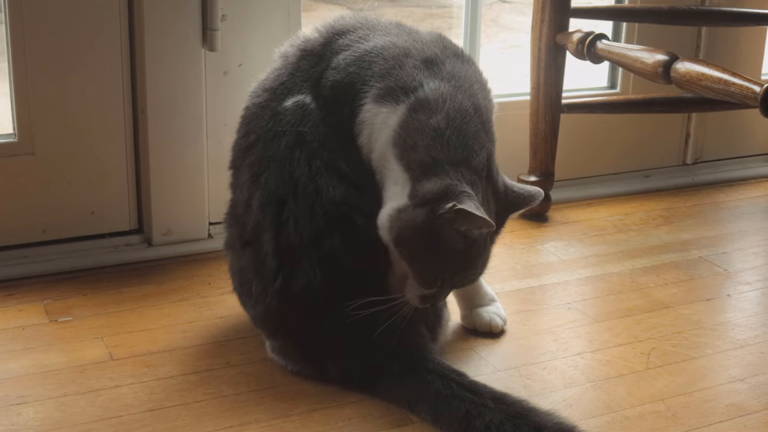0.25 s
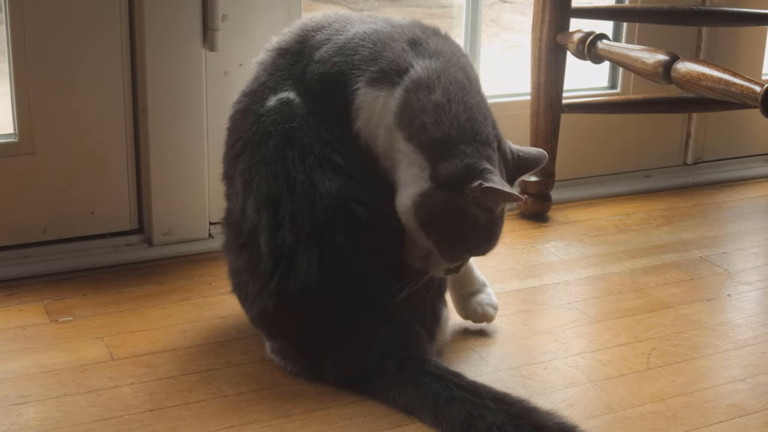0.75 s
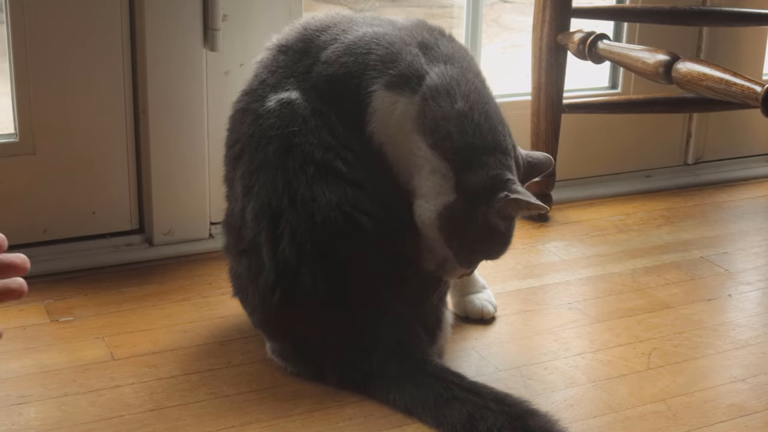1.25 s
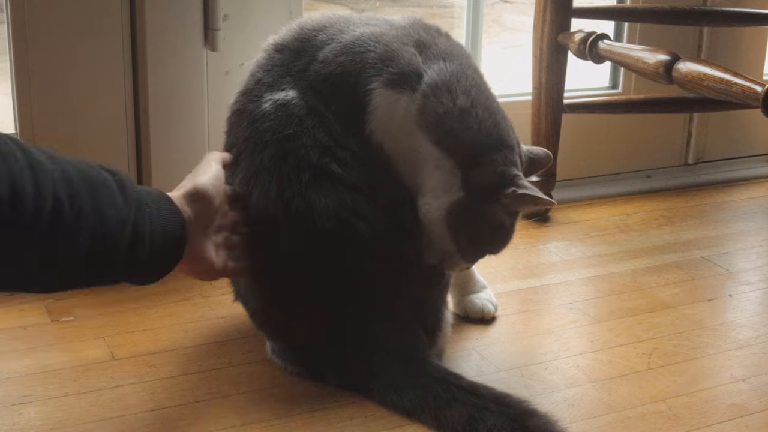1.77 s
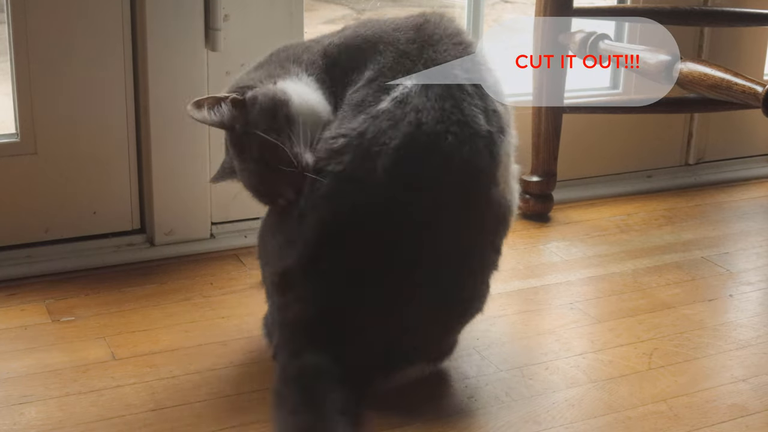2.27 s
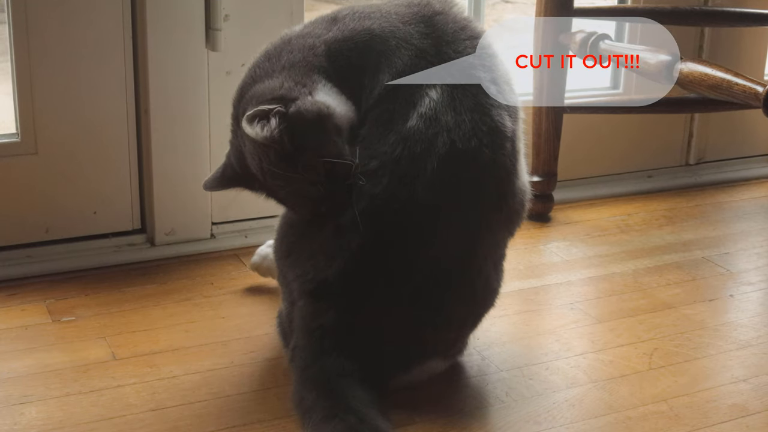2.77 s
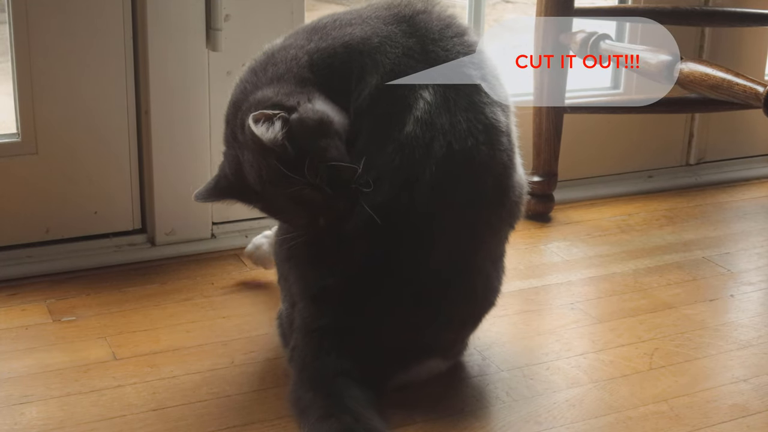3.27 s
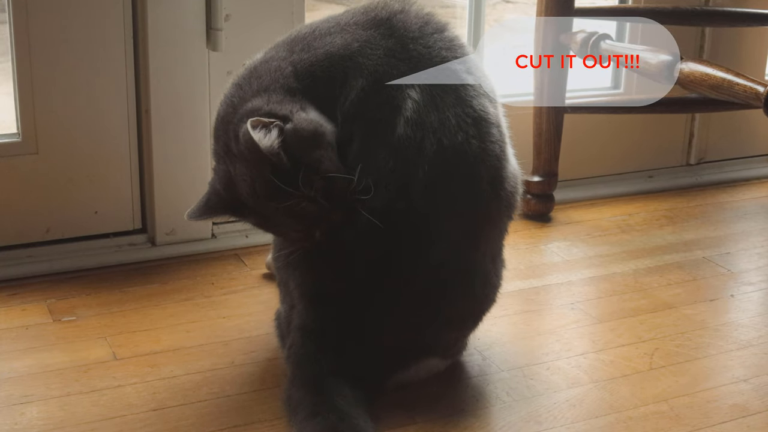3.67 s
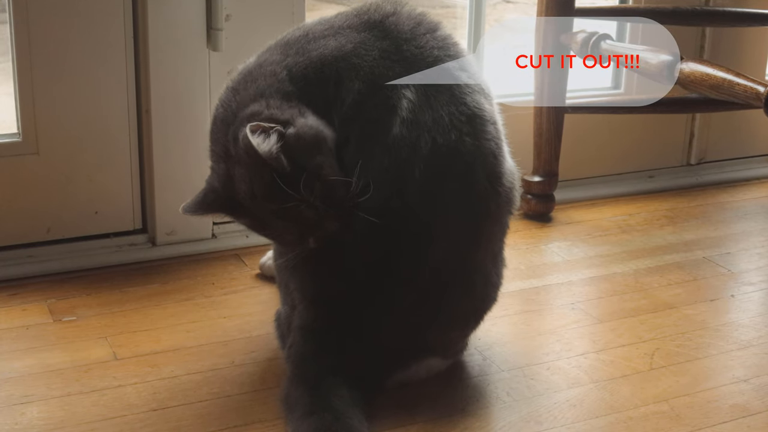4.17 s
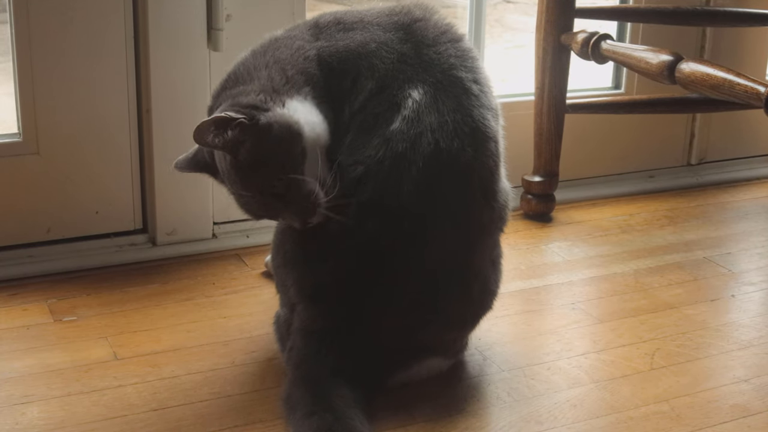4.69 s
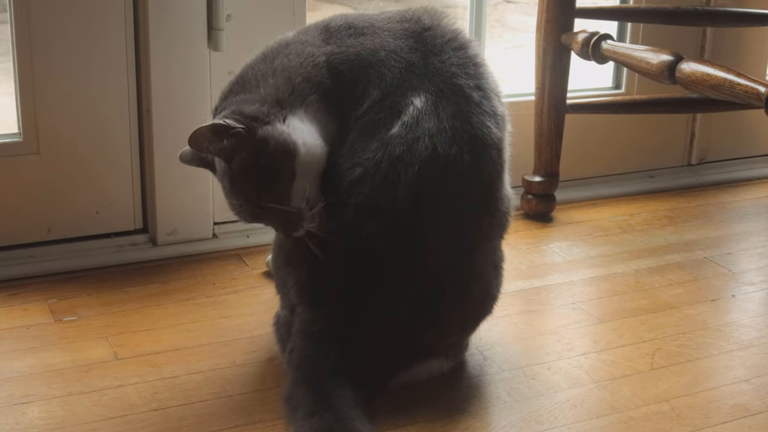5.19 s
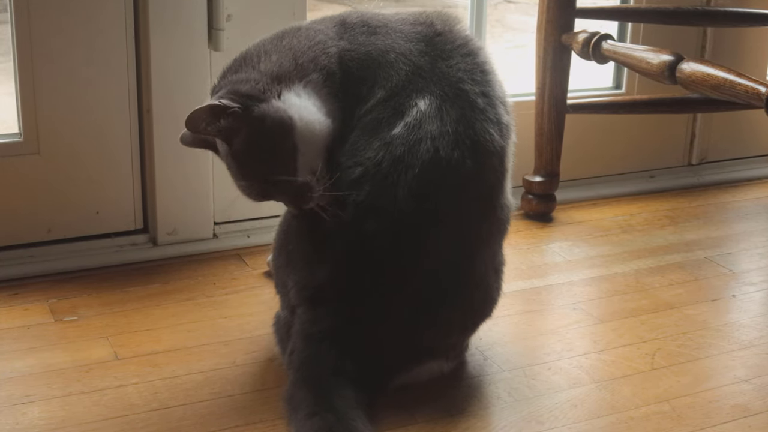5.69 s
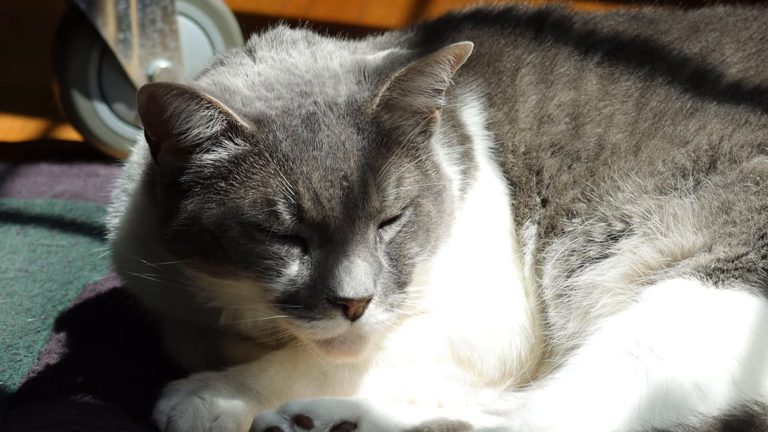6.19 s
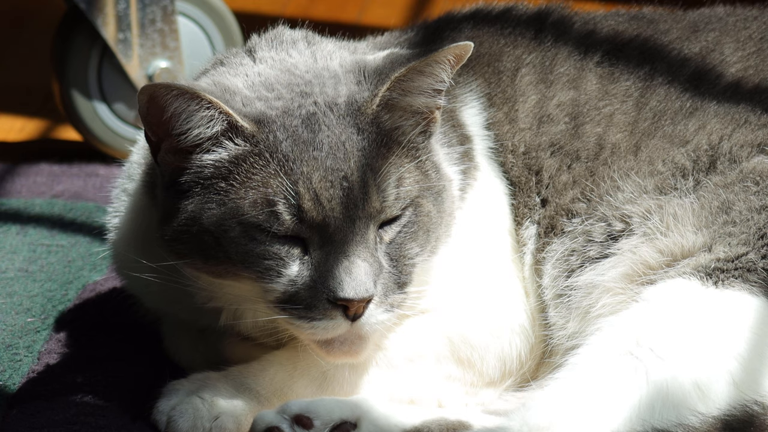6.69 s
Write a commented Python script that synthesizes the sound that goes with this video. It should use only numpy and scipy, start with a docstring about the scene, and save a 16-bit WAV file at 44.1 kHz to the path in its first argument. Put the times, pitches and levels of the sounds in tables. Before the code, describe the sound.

A cat grooms close to a small stereo microphone in a bare, reverberant room with a wooden floor. Short wet clicks come irregularly, with soft fur rustle and low shuffling in the boards. Farther off, objects are knocked and set down: thumps at the start, a clack near 1.4 seconds, the strongest bang near 3.1, another around 5.1. Faint air noise and hum lie beneath. It cuts dead near 6.2 seconds.

```python
"""In a bare, echoing house with a wooden floor, a cat licks its fur a step from a small stereo camera.
Air noise is shaped noise and a low appliance hum is wavering sines; fur rustle is filtered crackle,
and shifting weight is soft low noise in the boards. Further off, things are knocked and set down:
banded noise echoes with ringing panels. Tongue clicks are short dying sines with wet noise snaps.
The sound stops dead before the end."""
import sys
import numpy as np
from scipy import signal
from scipy.fft import rfft, irfft, next_fast_len
from scipy.io import wavfile
from scipy.ndimage import uniform_filter1d

SR = 44100
rng = np.random.default_rng(int(sys.argv[2]) if len(sys.argv) > 2 else 0)


def unload_audio(sound):
    """Save the sound as a 16-bit wav file, at the path given as the first command line argument."""
    columns = np.transpose(np.atleast_2d(sound))
    # keep every value between -1 and 1, then stretch to whole-number steps
    steps = np.round(np.clip(columns, -1, 1) * 32767)
    wavfile.write(sys.argv[1], SR, steps.astype(np.int16))


N = 306039  # samples

# All levels are relative to one another, ahead of the stereo balance and the camera.
# Air noise spectrum: frequency_hz, density_db (its shape only; AIR_DB sets the level)
AIR_SPECTRUM = [(15, -58.5), (35, -23), (64, -5.5), (102, -3.5), (223, 0), (280, -9), (373, -1), (624, -11),
                (2000, -14.5), (8000, -26.5), (11700, -26), (13300, -34), (16000, -45)]
# Hum partials: frequency_hz, mean_level_db (rms)
HUM_PARTIALS = [(75.4, -62), (296.1, -62.5), (387.6, -64.5), (473.7, -71), (3208, -76), (7284, -99.5)]
# Strokes through the fur: loudest_s, level_db, swell_s, fade_s (both times to 10 dB down)
FUR_STROKES = [(0.0, -51, .05, 0.063), (1.96, -64, .04, 0.036), (2.16, -45.5, 0.19, 0.099),
               (2.582, -48.5, 0.016, 0.022), (2.78, -55.5, .08, 0.034), (3.67, -52, 0.02, 0.19),
               (3.78, -50, 0.049, 0.088), (3.94, -49, 0.1, .1), (4.28, -46.5, 0.078, 0.069),
               (4.65, -55, 0.14, 0.23)]
# Restlessness between strokes, joined by straight lines: time_s, rustle_db, shuffle_db
RESTLESSNESS = [(0, -60, -44.5), (.4, -66, -45.5), (.52, -81, -62), (.9, -65.5, -70), (1.6, -65, -51.5),
                (1.8, -62, -64), (1.95, -63, -49.5), (2.56, -57.5, -47.5), (2.75, -59, -58.5),
                (2.9, -71, -47), (3.1, -50, -47), (3.6, -60.5, -61), (3.791, -67, -50.5), (4.1, -72, -54),
                (4.27, -58, -48.5), (4.55, -63.5, -64.5), (5.4, -60, -57), (5.63, -62.5, -56),
                (5.8, -59.5, -51.5), (6.2, -64, -62)]
# Knocks in the house: start_s, boom_db, thud_db, thud_hz, clack_db, clack_hz,
# treble_fall_db_per_octave, rise_s (scaled by band), rattle_length_s, echo_ratio (to the room's decay)
HOUSE_KNOCKS = [(0.004, -56, -49.5, 284, -49, 3300, 9, 0.0011, 0.031, 1.7),
                (0.08, -33, -31, 282, -35, 1900, 16, 0.078, 0.075, 0.53),
                (0.138, -43, -25.5, 490, -34.5, 890, 3.13, 0.0025, .04, 0.76),
                (0.959, -69, -52.5, 620, -56, 1800, 11, 0.0043, .02, 0.96),
                (1.33, -64, -37, 327, -49, 2000, 3, 0.064, .079, 1.3),
                (1.397, -58, -30, 310, -30.5, 1930, 12, 0.0052, 0.033, 0.8),
                (1.804, -70, -40, 290, -41.5, 900, 1.5, 0.00053, 0.003, 0.25),
                (1.866, -60, -44.5, 408, -55, 2200, 4.5, 0.0036, 0.015, 1.2),
                (1.902, -43, -40, 280, -53, 2000, 15, 0.0057, 0.01, 1),
                (1.948, -53, -39.5, 278, -53, 3000, 1, 0.0051, 0.0085, 0.45),
                (2.015, -62, -41.5, 287, -48, 1920, 6.5, .0043, 0.013, .99),
                (2.328, -35, -60, 155, -38, 2370, 4.5, 0.00074, .008, 0.63),
                (2.489, -70.5, -44, 300, -53.5, 1810, 5, .01, .02, 1.4),
                (2.547, -41, -44.5, 138, -52, 806, 7, 0.0024, .015, 1.64),
                (2.869, -53, -32, 182, -35.5, 700, 4, 0.0039, 0.035, 0.73),
                (3.095, -44, -20.5, 160.1, -20, 520, 2, 0.0057, .04, 0.91),
                (3.573, -64, -47.5, 436, -53.5, 1860, 6, 0.0092, 0.033, .92),
                (4.138, -52, -42.5, 310, -50, 840, 11.5, .002, 0.021, 0.87),
                (4.327, -54, -45.5, 150, -44.5, 764, 22, 0.0083, 0.019, 0.75),
                (5.086, -31.5, -23, 388, -26, 1260, 2, 0.013, 0.048, 0.9),
                (5.862, -28.5, -40.5, 163, -45, 390, 6, 0.011, 0.035, 1.14),
                (6.156, -40.5, -36, 190, -34, 1460, 8, 0.013, .035, 1)]
# Edges of adjoining frequency bands: edge_hz
BAND_EDGES_HZ = [60, 115, 210, 340, 620, 1050, 1500, 2600, 4500, 8000, 13500]
# Room decay in each band: t60_s (before a knock's echo_ratio)
ROOM_T60_S = [0.37, 0.37, 0.578, 0.56, 0.66, 0.75, 0.74, 0.68, 0.64, 0.49]
# Left-right likeness of the echo in each band: likeness (0 to 1)
ROOM_LIKENESS = [.96, .97, .9, .8, .4, .1, 0, .1, .05, .1]
# How strongly the house passes each band: gain_db
ROOM_GAIN_DB = [-4, 0.7, -0.5, 1, 0, -0.3, 1.5, 0.1, 1.35, -0.5]
# Floor and door panel modes: frequency_hz, level_db (before PANELS_DB), t60_s (before echo_ratio)
PANEL_MODES = [(103, 3, 0.17), (138, 4.5, 0.24), (182.7, 2.5, 0.59), (281, -4.5, 0.17), (298, 4.5, 0.16),
               (387.6, 2.5, 0.65), (417, -2, 0.33), (492, -8.5, 0.46), (734, -12, 0.37), (895, 3, 0.57),
               (995, -10.5, 0.3), (1504, 0, 0.29)]
# Tongue clicks: start_s, mouth_db, mouth_hz, snap_db, snap_hz (levels are of the main sine before decay)
TONGUE_CLICKS = [(.097, -52, 2000, -39, 9000), (.304, -60, 2000, -47, 11500), (.392, -52, 2000, -48, 10300),
                 (.4045, -42, 5000, -38, 7040), (.5283, -64, 2000, -44, 9860),
                 (.865, -59, 2000, -37, 11700), (.991, -54, 2700, -47, 7290),
                 (1.0556, -41, 1850, -63, 6900), (1.1137, -41, 2320, -44, 8930),
                 (1.741, -40, 2600, -35, 9500), (2.0786, -35, 1500, -37, 3200),
                 (2.5086, -49, 2000, -41, 6800), (2.641, -45, 1810, -58, 7430),
                 (3.791, -42, 2120, -54, 7040), (4.017, -41, 2000, -56, 6230),
                 (4.025, -40, 2150, -57, 6000), (4.033, -42, 2500, -55, 6300),
                 (4.040, -41, 3000, -59, 6500), (4.047, -43, 2400, -63, 6500),
                 (4.463, -48, 2700, -58, 6000), (4.478, -44, 2900, -66, 6080),
                 (4.882, -36, 2050, -47, 9430), (4.9786, -30, 2150, -41, 7360),
                 (5.015, -36, 1800, -41, 4300), (5.040, -62, 2270, -47, 6000),
                 (5.3615, -33, 2333, -53, 6180), (5.7786, -32, 5140, -41, 7500)]

AIR_DB = -52.5  # rms
PANELS_DB = -5.5  # added to every panel mode
BOOM_HZ = 88
THUD_FALL_DB = 22.5  # fall one octave off the pitch of boom or thud, growing as octaves squared
CLACK_RISE_DB = 4.5  # per octave below the clack's pitch
EARLY_SHARE, EARLY_T60_S = 0.31, 0.12  # the near walls' echo; the decay is scaled by echo_ratio
MOUTH_CYCLES = 30  # cycles of the mouth's main ring until 60 dB down
FLOOR_ECHO_DB, SCATTER_DB = -8, -35
RIGHT_DB = 2.5  # right above left
LOW_CUT_HZ, TOP_HZ = 45, 15700
STOP_S = 6.197

FFT_SIZE = next_fast_len(N + SR)
HZ = np.arange(FFT_SIZE // 2 + 1) * SR / FFT_SIZE
BAND_FILTERS = [signal.butter(3, edges, "band", fs=SR, output="sos")
                for edges in zip(BAND_EDGES_HZ, BAND_EDGES_HZ[1:])]


def undb(db):
    """Decibel law: amplitude gain is ten to the power of level over twenty."""
    return 10 ** (np.asarray(db) / 20)


def level(x, db):
    """Root-mean-square normalisation: scale a signal to an rms level."""
    return x * undb(db) / np.sqrt(np.mean(x ** 2))


def walk(rate):
    """Smoothed random modulation: levels held 1 / rate s, averaged twice, with a spread near 1."""
    hold = int(SR / rate)
    steps = np.repeat(rng.standard_normal(N // hold + 1), hold)
    slewed = uniform_filter1d(uniform_filter1d(steps, hold), hold)
    return 1.5 * slewed[:N]


def air_noise():
    """Diffuse-field coherence: left and right agree in the bass and part towards the treble."""
    hz, db = np.transpose(AIR_SPECTRUM)
    colour = undb(np.interp(np.log(HZ + 1), np.log(hz), db))
    alike = .9 / (1 + (HZ / 750) ** 3)
    mid, side = rfft(rng.standard_normal((2, FFT_SIZE)))
    sides = np.sqrt(1 - alike) * side * np.array([[1], [-1]])
    air = irfft(colour * (np.sqrt(1 + alike) * mid + sides))[:, :N]
    return level(air, AIR_DB)


def appliance_hum():
    """Additive synthesis: steady partials wavering in level and phase."""
    t = np.arange(N) / SR
    hum = np.zeros(N)
    for hz, db in HUM_PARTIALS:
        gain = np.sqrt(2) * undb(db + 1.0 * walk(8.6))  # rms to peak
        hum += gain * np.sin(2 * np.pi * hz * t + 0.6 * walk(24))
    return hum


def band(lo_hz, hi_hz, steep=3):
    """Butterworth magnitude law: a smooth band-pass gain over the spectrum."""
    low_side = 1 + (lo_hz / (HZ + 1)) ** (2 * steep)
    high_side = 1 + (HZ / hi_hz) ** (2 * steep)
    return 1 / np.sqrt(low_side * high_side)


def pair(count, alike):
    """Stereo correlation: shared and opposed noise mixed to a given left-right likeness."""
    mid, side = rng.standard_normal((2, count))
    alike = np.clip(alike, 0, 1)
    return np.sqrt((1 + alike) / 2) * mid + np.sqrt((1 - alike) / 2) * side * np.array([[1], [-1]])


def fur_rustle():
    """Friction noise: dense fine crackle between hairs, swelling with each stroke."""
    t = np.arange(N) / SR
    time_s, rustle_db, _ = np.transpose(RESTLESSNESS)
    power = undb(np.interp(t, time_s, rustle_db)) ** 2
    for at, db, swell, fade in FUR_STROKES:
        tens_of_db_down = np.where(t < at, (at - t) / swell, (t - at) / fade)
        power += undb(db - 10 * tens_of_db_down) ** 2
    # exponential spikes in dB make the crackle; the walk clumps it
    crackle = pair(N, .1) * undb(1.5 * rng.standard_exponential(N) + 1.2 * walk(30))
    colour = band(1000, 8700, steep=0.77) * band(100, 16000, steep=4.4) / np.sqrt(1 + HZ / 9000)
    rustle = irfft(rfft(crackle, FFT_SIZE) * colour)[:, :N]
    return level(rustle, 0) * np.sqrt(power)


def board_shuffle():
    """Structure-borne sound: shifting weight makes lumpy low noise in the boards."""
    time_s, _, shuffle_db = np.transpose(RESTLESSNESS)
    lumps = undb(3.2 * walk(45))
    thuds = irfft(rfft(pair(N, 0.8) * lumps, FFT_SIZE) * band(140, 430, steep=1.32))[:, :N]
    return level(thuds, 0) * undb(np.interp(np.arange(N) / SR, time_s, shuffle_db))


def ring(hz, t60, t):
    """Damped resonance: a sine dying exponentially by 60 dB in t60 seconds."""
    return np.sin(2 * np.pi * hz * t) * np.exp(-np.log(1000) * t / t60)


def add(track, s, sound):
    """Superposition: mix a sound into a track from a given second."""
    i = int(s * SR)
    track[..., i:i + sound.shape[-1]] += sound[..., :track.shape[-1] - i]


def house_bands(rise, length, echo):
    """Reverberation by band: reflections build, hold while the object rattles and die; panels resonate."""
    t = np.arange(SR * 3 // 4) / SR
    strike = undb(0.73 * rng.standard_normal(len(PANEL_MODES)))  # every blow lands elsewhere
    panels = np.zeros(len(t))
    for gain, (hz, db, t60) in zip(strike, PANEL_MODES):
        panels += gain * undb(db + PANELS_DB) * ring(hz, t60 * echo, t)
    # the struck object's own many short rings colour its whole echo
    body_t = t[:SR // 16]
    body = .028 * rng.standard_normal((1, SR // 16)) * np.exp(-np.log(1000) * body_t / .09)
    body[0, 0] = 1
    # strong single reflections come in clumps
    clump_steps = np.repeat(rng.standard_normal(len(t) // 256 + 1), 256)
    clumps = undb(2.0 * uniform_filter1d(clump_steps, 200)[:len(t)])
    after = np.log(1000) * np.maximum(t - length, 0) / echo
    for sos, t60, alike, low_hz in zip(BAND_FILTERS, ROOM_T60_S, ROOM_LIKENESS, BAND_EDGES_HZ):
        # the bass builds up first, through the boards
        band_rise = max(rise * (low_hz / 1000) ** 0.2, .0005)
        swell = 1 - np.exp(-(t / band_rise) ** 1.8)
        fade = EARLY_SHARE * np.exp(-after / EARLY_T60_S) + (1 - EARLY_SHARE) * np.exp(-after / t60)
        reflections = signal.fftconvolve(clumps * pair(len(t), alike), body, axes=1)[:, :len(t)]
        tail = level(signal.sosfilt(sos, reflections), 0) * fade
        yield swell * (tail + signal.sosfilt(sos, panels))


def hump(octave, db, hz):
    """Resonance curve: a level peak falling with the square of the distance in octaves."""
    return undb(db - THUD_FALL_DB * (octave - np.log2(hz)) ** 2)


def knocks():
    """Impact spectrum: a floor boom, a thud and a clack thinning to the treble, heard through the room."""
    out, edges = np.zeros((2, N)), np.log2(BAND_EDGES_HZ)
    octave = (edges[1:] + edges[:-1]) / 2  # band centres
    for s, boom_db, thud_db, thud_hz, clack_db, clack_hz, fall_db, rise, length, echo in HOUSE_KNOCKS:
        above = octave - np.log2(clack_hz)
        clack = undb(clack_db + np.where(above > 0, -fall_db, CLACK_RISE_DB) * above)
        boom, thud = hump(octave, boom_db, BOOM_HZ), hump(octave, thud_db, thud_hz)
        colour = undb(ROOM_GAIN_DB) * np.sqrt(boom ** 2 + thud ** 2 + clack ** 2)
        add(out, s, sum(gain * x for gain, x in zip(colour, house_bands(rise, length, echo))))
    return out


def tongue_clicks():
    """Cavity resonance: the tongue pulls free with two mouth rings and a wet snap."""
    out, t = np.zeros(N), np.arange(SR // 20) / SR
    for s, mouth_db, mouth_hz, snap_db, snap_hz in TONGUE_CLICKS:
        rings = ring(mouth_hz, MOUTH_CYCLES / mouth_hz, t) + .45 * ring(2.3 * mouth_hz, .005, t)
        mouth = rings * (1 - np.exp(-t / .0002))  # soft onset
        snap = ring(snap_hz, .0035, t) + .35 * rng.standard_normal(len(t)) * np.exp(-t / .0004)
        add(out, s, undb(mouth_db) * mouth + undb(snap_db) * snap)
    return np.array([out, out])


def licks():
    """Early reflection: floor and door return the clicks as one duller repeat and a short scatter."""
    near = tongue_clicks()
    dull = uniform_filter1d(near, size=9)
    repeat = np.roll(dull, int(0.018 * SR), axis=1)  # 18 ms later
    t = np.arange(SR // 8) / SR
    scatter = pair(len(t), .2) * np.exp(-np.log(1000) * t / .12) * (t > .003)
    scattered = signal.fftconvolve(near, scatter, axes=1)[:, :N]
    return near + undb(FLOOR_ECHO_DB) * repeat + undb(SCATTER_DB) * scattered


def scene():
    """Linear superposition: every source together, a little louder on the right."""
    mix = knocks() + licks() + fur_rustle() + board_shuffle() + air_noise() + appliance_hum()
    return mix * undb([[-RIGHT_DB / 2], [RIGHT_DB / 2]])


def record(dry):
    """Band limiting and saturation: deep bass cut, peaks rounded, sound cut off, top filtered away."""
    on = np.clip((STOP_S - np.arange(N) / SR) / .004, 0, 1)  # 4 ms fade to silence
    low_cut = signal.butter(2, LOW_CUT_HZ, "high", fs=SR, output="sos")
    top_cut = signal.ellip(10, .2, 80, TOP_HZ, fs=SR, output="sos")
    heard = signal.sosfilt(low_cut, dry)
    rounded = np.tanh(1.636 * heard) / 1.365
    return signal.sosfilt(top_cut, on * rounded)


dry = scene()
out = record(dry)
unload_audio(out)
```